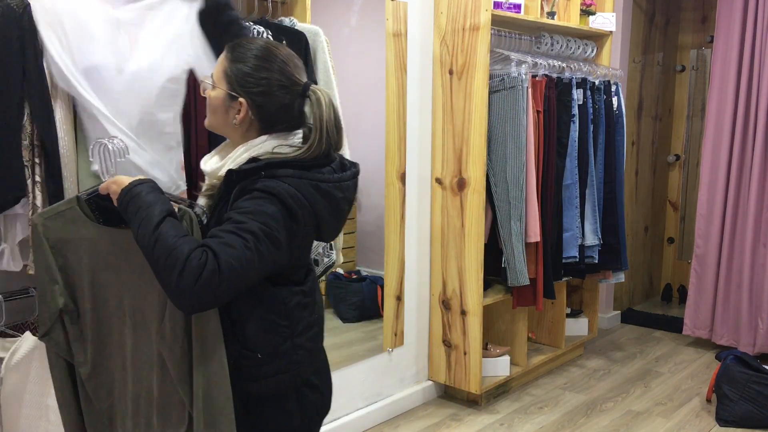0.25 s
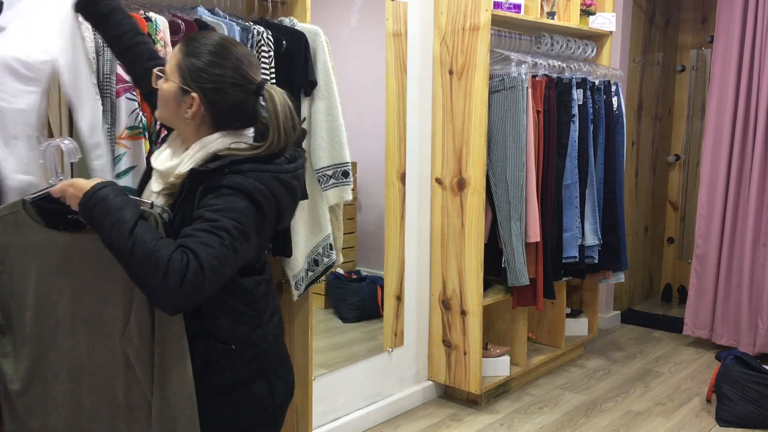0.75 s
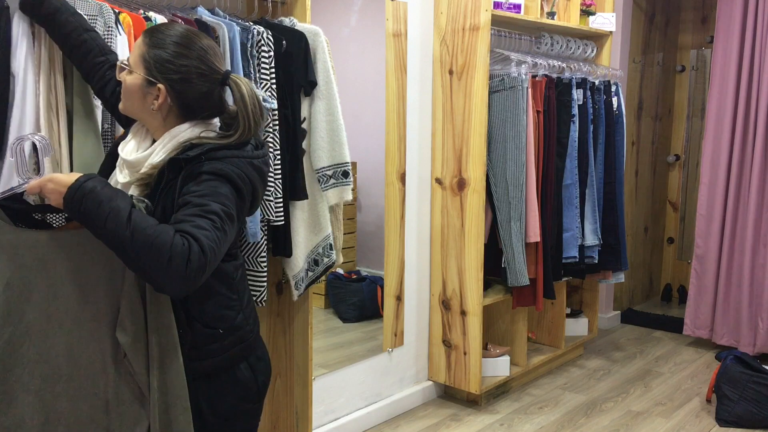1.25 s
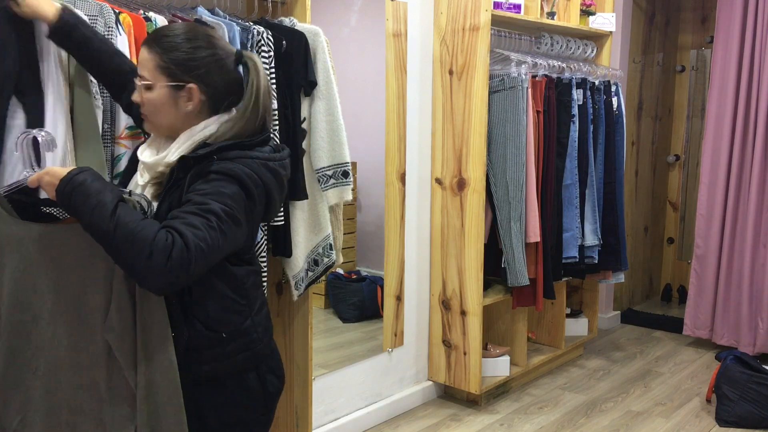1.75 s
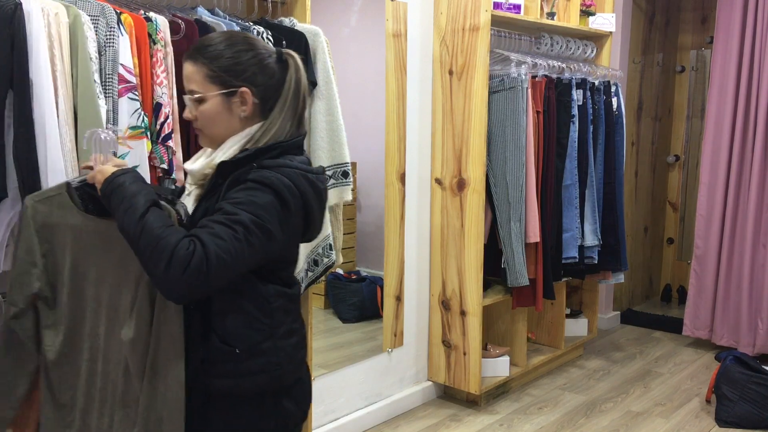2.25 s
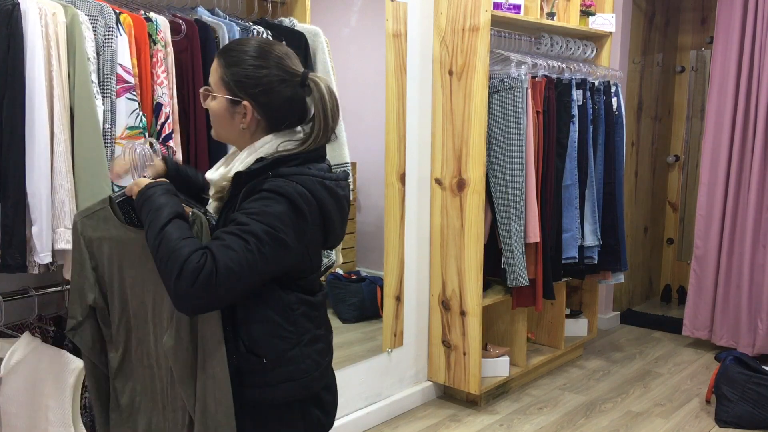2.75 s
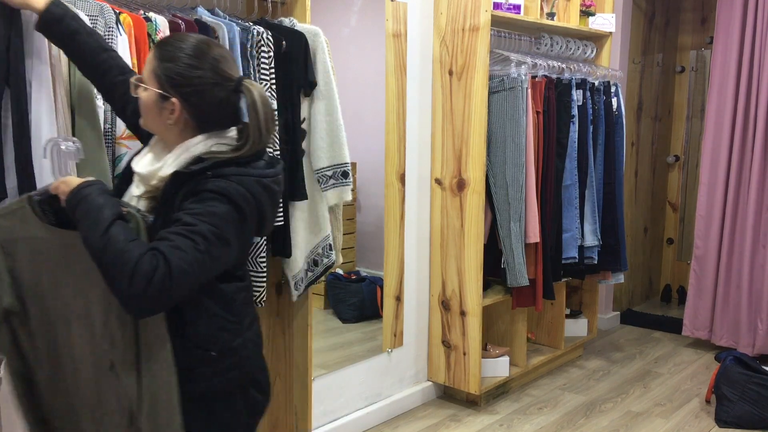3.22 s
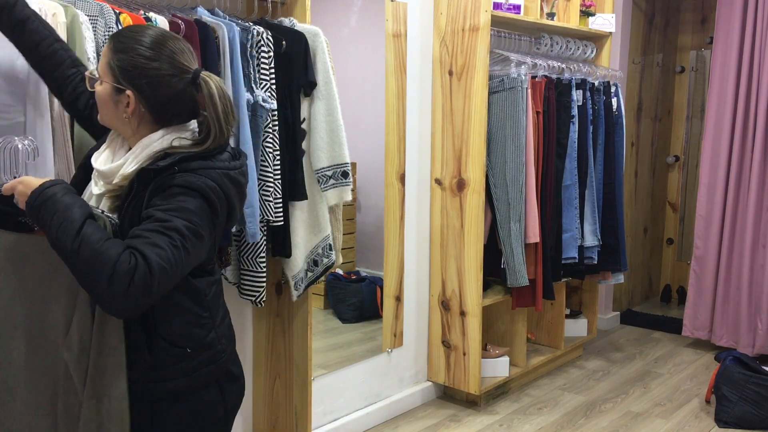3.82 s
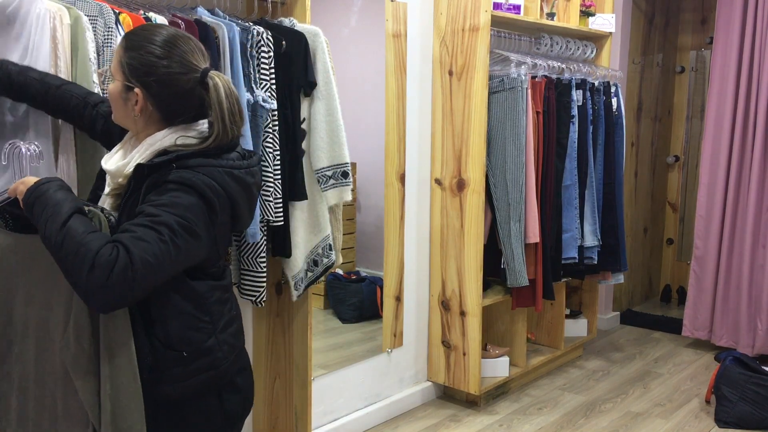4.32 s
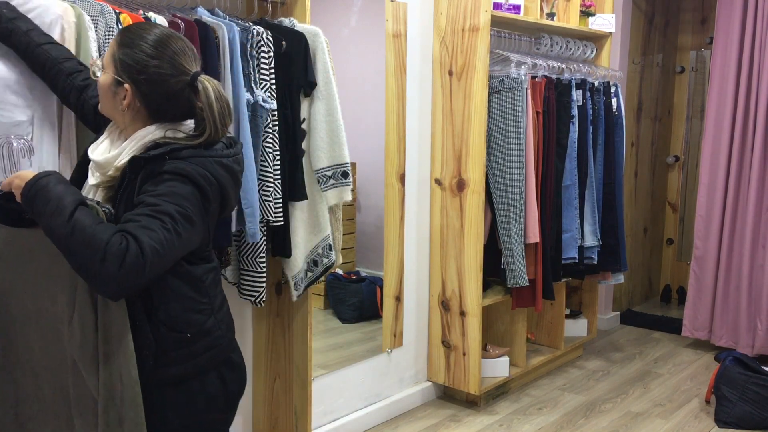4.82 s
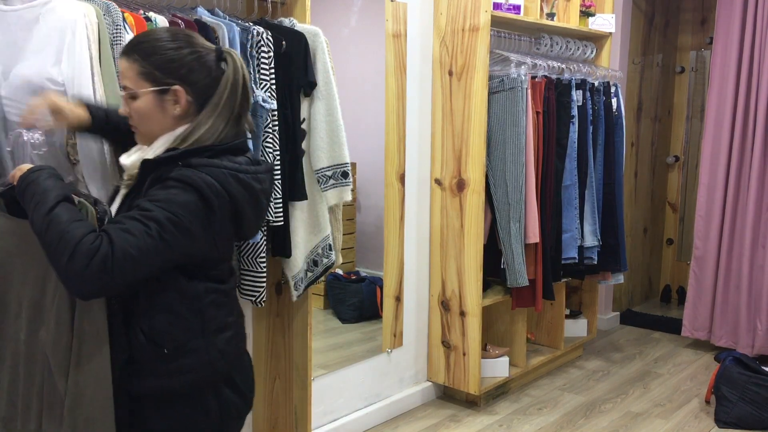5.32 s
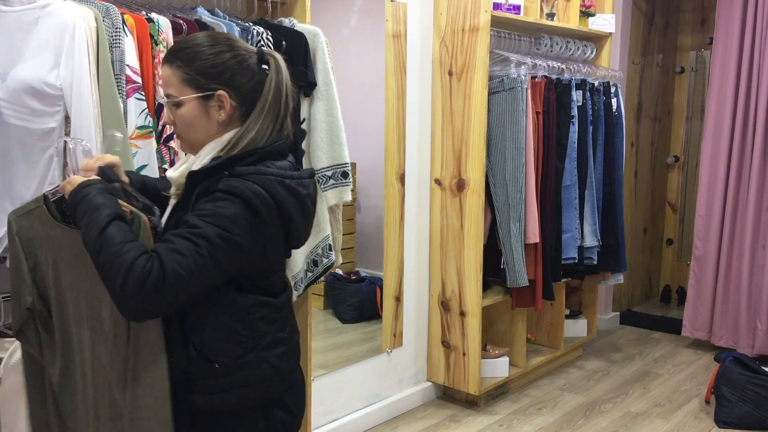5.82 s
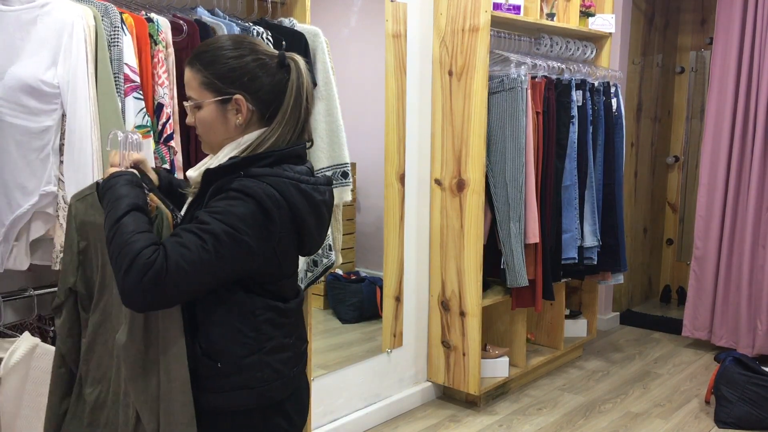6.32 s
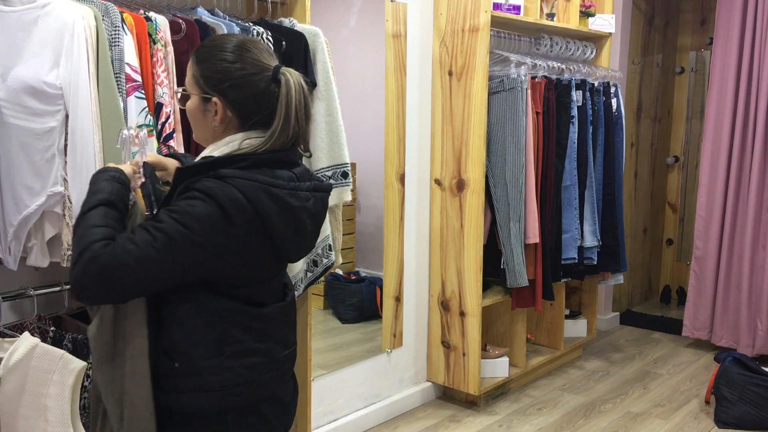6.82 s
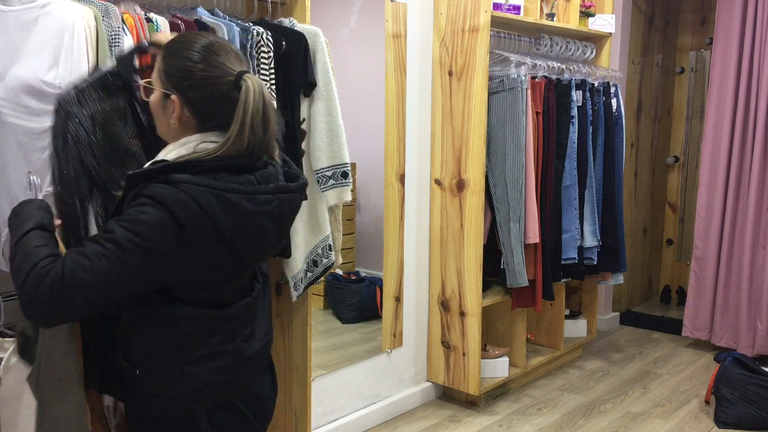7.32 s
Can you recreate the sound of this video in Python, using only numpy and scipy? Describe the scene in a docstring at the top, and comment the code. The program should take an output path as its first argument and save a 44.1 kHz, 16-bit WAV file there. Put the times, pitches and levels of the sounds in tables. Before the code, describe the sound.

In a small clothes shop, street traffic rumbles steadily through the walls. A plastic hanger clacks sharply against a steel rail and rings briefly. Later, wire hooks scrape and click in two quick clusters, with soft bumps of clothes and faint swishes of a nylon jacket sleeve. In the second half, an engine outside twice settles into a low drone. The hangers sound near, with a short room echo.

```python
"""Plastic hangers are handled at a steel rail in a small clothes shop. One clacks against the rail
and its whole frame rings, another rubs past its neighbour, and wire hooks click and scrape.
Clothes bump softly, and the nylon sleeve of a padded jacket swishes as an arm moves.
Street traffic booms through the walls, and twice an engine outside settles into a low drone."""
import sys
import numpy as np
from scipy import signal
from scipy.fft import rfft, irfft, next_fast_len
from scipy.io import wavfile

SR = 44100
rng = np.random.default_rng(int(sys.argv[2]) if len(sys.argv) > 2 else 0)


def master_out(mix):
    """Clip the mix to full scale and print it as 16-bit PCM to the path in sys.argv[1]."""
    frames = np.transpose(np.atleast_2d(mix))
    ceiling = np.clip(frames, -1, 1)
    pcm = np.round(ceiling * 32767).astype(np.int16)
    wavfile.write(sys.argv[1], SR, pcm)


N = 333396

# How long the shop echoes (a fade_s is the time to drop by 60 dB): freq_hz, fade_s
SHOP_ECHO = [(200, 0.68), (1400, 0.4), (4000, 0.26), (9500, 0.24), (15000, 0.15)]
# Dips where low sound waves cancel in the room: freq_hz, gain_db
ROOM_DIPS = [(82, 0.5), (90, -4.5), (98, 0.5), (210, 0), (218, -7), (226, -3.5), (240, 0)]
# The tone of the microphone: freq_hz, gain_db
MIC_TONE = [(20, 5), (32, 0.5), (4680, 0), (4960, -6), (5300, 0), (10000, -1), (10400, -5.5), (10900, 0.5)]

# Tyre noise growing as traffic comes closer: time_s, level_db
TYRE_LEVELS = [(0, -55.5), (.5, -58.5), (2.85, -58), (3.6, -54.5), (5.6, -50.5), (7.56, -50.5)]
# The tone of the tyres and of the street's rumble: freq_hz, gain_db
TYRE_TONE = [(200, -23), (400, -4), (700, -6), (1150, -4), (1550, -7.5), (1900, -12.5), (2500, -10.5),
             (4300, -17.5), (5900, -15.5), (7700, -20), (9400, -18), (11000, -21), (13500, -21),
             (15700, -24.5)]
RUMBLE_TONE = [(20, -52), (36, 0), (45, -7.5), (62, 6.5), (78, 0.5), (91, 1), (101, -3.5), (114, -8),
               (128, -5), (150, -10.5), (205, -16.5), (260, -15), (330, -18), (700, -55.5)]
# Low notes from far traffic: peak_s, pitch_hz, level_db, half_length_s
FAR_BOOMS = [(.09, 71.4, -36, 0.072), (2.386, 63.1, -32.5, 0.11), (2.755, 64, -33.5, 0.087),
             (3.364, 71.3, -33.5, 0.048), (3.667, 67.7, -30.5, 0.045), (4.348, 65.96, -38.5, 0.073),
             (6.19, 65.7, -43.5, 0.18)]
# A heavy vehicle pulling through its gears: peak_s, level_db, rise_s, fall_s
GEAR_PULLS = [(.98, -35.5, .25, 0.092), (2.15, -38.5, 0.28, 0.25)]
# An engine dropping from a rev to a drone: start_s, end_s, level_db
ENGINE_DRONES = [(4.83, 5.884, -30), (6.76, 7.558, -28)]
# The higher notes in its buzz: multiple_of_firing_rate, gain_db
ENGINE_OVERTONES = [(2, 2), (3, 1), (4, -10.5), (5, -13), (7, -15.5), (8, -15.5), (9, -21), (10, -18.5),
                    (12, -14.5), (13, -30), (14, -22), (15, -17.5), (22, -24)]

# Moves of the sleeve: peak_s, level_db, half_length_s
SLEEVE_STROKES = [(0.115, -60, 0.065), (3.386, -61, 0.09), (3.96, -80, .06), (4.128, -66, 0.045),
                  (4.7, -63, 0.068), (6.007, -57.5, 0.21), (6.616, -62, 0.047), (6.795, -60, 0.12)]
# Where the hiss of nylon is strongest: freq_hz, width_hz, gain_db
NYLON_PEAKS = [(900, 900, -4), (2700, 1600, 4.5), (5860, 450, 0), (9250, 350, 3.5), (12850, 260, 5.5),
               (13200, 240, -2)]
# Clothes bumping their neighbours: start_s, level_db, pitch_hz, rise_s
CLOTHES_BUMPS = [(1.074, -50, 790, .012), (1.103, -50.5, 775, 0.01), (2.984, -50.5, 534, 0.007),
                 (3.03, -55, 850, 0.0073), (3.427, -53, 950, 0.013), (3.493, -45, 308, 0.022),
                 (3.893, -52.5, 322, 0.014), (4.66, -52, 245, .06), (4.796, -48, 290, 0.032),
                 (4.815, -54, 950, .02), (4.968, -47, 255, 0.029)]
# Where a dragged hanger squeaks: freq_hz, width_hz, gain_db
SQUEAK_PEAKS = [(304, 50, 7), (940, 95, -1), (1250, 52, 3.5), (1540, 69, 0), (2600, 61.5, 1),
                (3040, 80, -6)]
# The tone of a hook scraping the rail: freq_hz, gain_db
SCRAPE_TONE = [(180, -23), (310, -4), (480, -8), (1200, -2), (2000, -7), (3300, 1), (5000, -0.5),
               (6500, -0.5), (9000, 2), (12500, -1), (15700, -3.5)]
# Hooks tapping the rail and each other: start_s, rail_db, hook_db, fade_s
HOOK_TAPS = [(.751, -54, -61, .045), (1.412, -41, -68, .011), (2.547, -37, -33.5, .068),
             (3.5357, -29.5, -34, .025), (3.588, -46, -29.5, .047), (3.6562, -17, -25, 0.058),
             (3.7404, -20, -22.5, .03), (3.9003, -49, -60, .016), (4.819, -26.5, -42, .038),
             (4.8283, -18, -28.5, 0.031), (4.8943, -19.5, -22, 0.031), (4.9453, -19, -30, 0.05),
             (4.9628, -9.5, -27, 0.036), (4.976, -26, -41, .039), (4.988, -25, -25.5, .036),
             (5.609, -51, -43, .03), (5.632, -38, -38, 0.04), (6.2591, -32, -29, .05),
             (6.51, -61, -48, .042), (6.626, -67, -46, .039), (6.828, -62, -44.5, 0.039)]
# Where the rail, the wire hook and the plastic under it ring: freq_hz, width_hz, gain_db
RAIL_PEAKS = [(6350, 160, -17), (6740, 310, -10.5), (7800, 350, -7.5), (8670, 320, -5.5), (9550, 210, -4.5),
              (10000, 300, -4), (10800, 220, -1.5), (12000, 200, 4), (11770, 220, 4), (13000, 320, 2),
              (13400, 400, 1), (14104, 200, -7), (14500, 390, 2), (14800, 430, 3), (15600, 250, -10)]
HOOK_PEAKS = [(6240, 220, -3), (6730, 150, -9.5), (7470, 230, -6), (8600, 130, -9), (9390, 200, 3),
              (10100, 120, -4), (10650, 160, -7), (11750, 130, 1), (12900, 200, -0.5), (13300, 260, -14),
              (14400, 130, -8), (14900, 130, -10), (15500, 200, -10)]
PLASTIC_PEAKS = [(286, 66, 6), (507, 53, -5), (884, 84, 0), (1270, 89, -0.5), (1575, 58, 1),
                 (1840, 56, -1.5), (2210, 200, -5.5), (2675, 120, -1.5), (3120, 300, -6), (3670, 290, -7),
                 (4070, 130, -2.5), (4550, 640, -6), (6040, 920, -4.5)]
# The tone of plastic striking the rail: freq_hz, gain_db
CRACK_TONE = [(120, -10), (270, 5.5), (480, -1), (620, 2), (1100, -11.5), (1600, 3), (2000, -7),
              (3200, -0.5), (3850, 2), (4650, 5.5), (5300, -4), (8700, 5.5), (11700, 4.5), (15500, 1)]
# The notes of a struck hanger frame: pitch_hz, gain_db, fade_s
FRAME_NOTES = [(238, -1, 0.52), (272, -2, 0.54), (338, -8.5, 0.29), (420, -14, 0.39), (480, -11, 0.63),
               (563, -5, 0.42), (623, -2, 0.29), (910, -2, 0.31), (1189, -6.5, 0.44), (1330, -8, 0.39),
               (1570, -1, 0.2), (1640, 0, 0.19), (2150, -5, 0.18), (2600, -9, .22), (3010, -8.5, 0.26),
               (3810, -1, 0.22), (4200, -17, 0.22), (4580, -9, 0.25), (6030, -22, 0.19), (6950, -13, 0.18),
               (7660, -11, 0.14), (8000, -8, 0.18), (8710, 1, 0.15), (9183, -7, .2), (9900, -14, 0.18),
               (11300, -6, 0.17), (11430, 4, 0.15), (12063, -9, .17), (13200, -9, .17), (14700, 3, 0.14)]


def amp(db):
    """Turn decibels into a number to multiply by."""
    return 10 ** (np.asarray(db) / 20)


def unit(x):
    """Scale a sound to an average (rms) strength of 1."""
    return x / np.sqrt(np.mean(x ** 2) + 1e-20)


def along(points, hz):
    """Read between the rows of a (freq_hz, value) table, on a log frequency scale."""
    freqs, values = np.transpose(points)
    return np.interp(np.log(hz + 1), np.log(freqs + 1), values)


def wobble(rate):
    """A smooth random curve through `rate` points a second."""
    count = int(N * rate / SR) + 4
    smooth = signal.resample(rng.standard_normal(count), count * 10)
    return np.interp(np.arange(N) * rate / SR, np.arange(len(smooth)) / 10, smooth)


def fade(t, fade_s):
    """Die away by 60 dB every fade_s seconds."""
    return np.exp(-np.log(1000) * t / fade_s)


def swell(t, rise_s, fall_s):
    """A bell-shaped rise and fall that peaks at t = 0."""
    return np.exp(-(t / np.where(t < 0, rise_s, fall_s)) ** 2 / 2)


def add(track, start_s, sound):
    """Mix a sound into the track at start_s."""
    part = track[max(round(start_s * SR), 0):][:len(sound)]
    part += sound[:len(part)]


def filtered(x, gain_at):
    """Multiply each frequency in a sound by gain_at(hz)."""
    size = next_fast_len(len(x) + 8192)
    return irfft(rfft(x, size) * gain_at(np.fft.rfftfreq(size, 1 / SR)), size)[:len(x)]


def shaped(x, tone):
    """Give a sound the tone of a (freq_hz, gain_db) table."""
    return filtered(x, lambda hz: amp(along(tone, hz)))


def noise(tone, size=N):
    """Noise of strength 1 with the given tone."""
    return unit(shaped(rng.standard_normal(size), tone))


def ringing_noise(peaks, size=N):
    """Noise of strength 1 gathered around (freq_hz, width_hz, gain_db) peaks."""
    centre, width, db = np.transpose(peaks)[:, :, None]

    def gain_at(hz):
        each_peak = amp(db) * hz * width / (centre ** 2 - hz ** 2 + 1j * hz * width)
        return np.linalg.norm(each_peak, axis=0)
    return unit(filtered(rng.standard_normal(size), gain_at))


def ringing_notes(notes, t, scatter_db):
    """Pure notes that fade together, each at a slightly random strength."""
    hz, db, fade_s = np.transpose(notes)[:, :, None]
    gain = amp(db + scatter_db * rng.standard_normal(db.shape))
    phase = 2 * np.pi * (hz * t + rng.random(hz.shape))
    return np.sum(gain * np.sin(phase) * fade(t, fade_s), axis=0) / np.linalg.norm(gain)


def in_shop(x, echo_db):
    """Add the small room's echo, in which low notes last longest."""
    hz, t, bands = signal.stft(rng.standard_normal(SR // 2), SR, nperseg=256)
    echo = signal.istft(bands * fade(t, along(SHOP_ECHO, hz)[:, None]), SR, nperseg=256)[1]
    echo *= 1 - np.exp(-(np.arange(len(echo)) / SR / 0.0088) ** 2)  # echoes take a moment to build
    echo *= amp(echo_db) / np.linalg.norm(echo)
    echo[0] += 1  # the direct sound
    return signal.fftconvolve(x, echo)[:len(x)]


def street():
    """Tyre noise gets brighter as it grows, over a rumble that gathers in the room's low notes."""
    times, levels = np.transpose(TYRE_LEVELS)
    tyre_db = np.interp(np.arange(N) / SR, times, levels)
    growth_db = tyre_db - tyre_db.mean()
    tyres = noise(TYRE_TONE)
    roar = filtered(tyres, lambda hz: 1 / (1 + (hz / 1600) ** 4))
    hiss = tyres - roar
    road = amp(growth_db) * hiss + amp(0.75 * growth_db) * roar  # the low roar grows more slowly
    rumble = amp(-40.5 + 0.33 * growth_db + 0.5 * wobble(5)) * noise(RUMBLE_TONE)
    return amp(tyre_db.mean() + 0.48 * wobble(9)) * road + rumble


def far_traffic():
    """Far traffic comes through only as single low notes that swell and fade."""
    out, t = np.zeros(N), np.arange(N) / SR
    for peak_s, hz, db, half_s in FAR_BOOMS:
        note = unit(np.sin(2 * np.pi * (hz * t + rng.random())))
        out += amp(db) * swell(t - peak_s, half_s, half_s) * note
    return out


def heavy_vehicle():
    """A heavy vehicle throbs, its pitch climbing as it pulls through each gear."""
    out, t = np.zeros(N), np.arange(N) / SR
    pitch_hz, climb_hz_per_s = 36.6, 4.5
    for peak_s, db, rise_s, fall_s in GEAR_PULLS:
        hz = pitch_hz + climb_hz_per_s * (t - peak_s)
        note = unit(np.sin(2 * np.pi * np.cumsum(hz) / SR))
        out += amp(db) * swell(t - peak_s, rise_s, fall_s) * note
    return out


def engine():
    """An engine slows from a rev to a steady firing rate, where the room booms and buzzes with it."""
    out, t = np.zeros(N), np.arange(N) / SR
    steady_hz, rev_extra_hz, settle_s = 69.1, 6, 0.13
    sag_hz_per_s, build_db_per_s, boom_width_hz = 12.3, 2.5, 5.5
    for start_s, end_s, db in ENGINE_DRONES:
        early, late = np.minimum(t - start_s, 0), np.maximum(t - end_s, 0)
        rev_hz = rev_extra_hz * np.exp(-np.maximum(t - start_s, -settle_s) / settle_s)
        hz = steady_hz + rev_hz - sag_hz_per_s * late
        phase = 2 * np.pi * np.cumsum(hz * (1 + 0.0012 * wobble(8))) / SR
        settled = 1 / (1 + ((hz - steady_hz) / boom_width_hz) ** 2)  # 1 at the steady rate
        hum_db = db + build_db_per_s * np.minimum(t - end_s, 0) + 0.95 * wobble(11)
        hum = amp(hum_db) * unit(np.sin(phase))
        buzz = unit(sum(
            amp(gain_db + 1.3 * wobble(5.5)) * np.sin(multiple * phase + 2 * np.pi * rng.random())
            for multiple, gain_db in ENGINE_OVERTONES))
        octave = unit(np.sin(2 * phase))  # takes over while the engine revs
        overtones = amp(-44) * settled ** 2 * buzz + amp(-40.3) * np.sqrt(1 - settled) * octave
        out += swell(early + late, rise_s=0.09, fall_s=0.089) * settled * hum
        out += swell(early + late, rise_s=0.055, fall_s=0.049) * overtones
    return out


def sleeve():
    """The nylon weave of a padded jacket swishes faintly at each move of the arm."""
    t = np.arange(N) / SR
    strokes = sum(amp(db) * swell(t - peak_s, half_s, half_s) for peak_s, db, half_s in SLEEVE_STROKES)
    return strokes * amp(0.64 * wobble(30)) * ringing_noise(NYLON_PEAKS)


def clothes_bumps():
    """Hangers padded by their clothes meet with dull, hollow bumps."""
    out, t = np.zeros(N), np.arange(SR // 3) / SR
    for start_s, db, hz, rise_s in CLOTHES_BUMPS:
        peaks = [(hz, hz / 9, 0), (hz * 1.45, hz / 6, -3), (hz * 2.08, hz / 4, -9)]
        soft_push = t / rise_s * np.exp(1 - t / rise_s)
        add(out, start_s, amp(db) * ringing_noise(peaks, len(t)) * soft_push)
    return in_shop(out, echo_db=-9.5)


def hanger_rub():
    """A hanger rubs past its neighbour, its pitch rising as the touching point slides."""
    start_s, end_s, start_hz, end_hz = 4.835, 4.995, 1000, 2850
    t = np.arange(N) / SR
    held_t = np.clip(t, start_s, end_s)
    progress = (held_t - start_s) / (end_s - start_s)
    hz = start_hz * (end_hz / start_hz) ** (progress ** 1.3)  # the slide speeds up
    phase = 2 * np.pi * np.cumsum(hz) / SR
    friction = unit(wobble(520) * np.sin(phase) + wobble(520) * np.cos(phase))  # a narrow band of noise
    stroke = swell(t - held_t, rise_s=0.016, fall_s=0.016)
    return in_shop(amp(-53.5) * stroke * friction, echo_db=-3)


def hook_scrape():
    """A dragged hook first squeaks through its hanger, then catches on the rail in many tiny slips."""
    t = np.arange(N) / SR
    squeak_s, rasp_s = 3.462, 3.485
    slips = rng.standard_normal(N) * amp(2.5 * wobble(1100))
    squeak = amp(-47.5) * swell(t - squeak_s, rise_s=0.016, fall_s=0.034) * ringing_noise(SQUEAK_PEAKS)
    rasp = amp(-39.5) * swell(t - rasp_s, rise_s=0.01, fall_s=0.04) * unit(shaped(slips, SCRAPE_TONE))
    return in_shop(squeak + rasp, echo_db=-5)


def hook_clicks():
    """Each hook chatters briefly on the rail, rings on, and shakes the plastic under it."""
    out, t = np.zeros(N), np.arange(SR // 3) / SR
    for start_s, rail_db, hook_db, fade_s in HOOK_TAPS:
        chatter = fade(t, fade_s)
        rail = amp(rail_db) * ringing_noise(RAIL_PEAKS, len(t)) * chatter
        hook = amp(hook_db) * ringing_noise(HOOK_PEAKS, len(t)) * (chatter + amp(-17) * fade(t, 0.23))
        tap_db = (rail_db + hook_db) / 2
        plastic = amp(-28.7 + 0.5 * tap_db) * ringing_noise(PLASTIC_PEAKS, len(t)) * fade(t, 0.09)
        add(out, start_s, in_shop(rail + hook, echo_db=-4.5) + in_shop(plastic, echo_db=-0.5))
    return out


def hanger_clack():
    """A plastic shoulder touches the rail, strikes it hard, rings, and knocks the next hanger."""
    out, t = np.zeros(N), np.arange(SR // 2) / SR
    strike_s = 1.2275
    touch = amp(-47) * noise(CRACK_TONE, len(t)) * fade(t, 0.06)
    add(out, strike_s - 0.0047, touch)
    contact = fade(t, 0.052) * (1 - 0.7 * fade(t, 0.012))
    crack = amp(-17.8) * noise(CRACK_TONE, len(t)) * contact
    frame = amp(-28) * ringing_notes(FRAME_NOTES, t, scatter_db=1) * (1 - fade(t, 0.012))
    add(out, strike_s, in_shop(crack, echo_db=-4.5) + frame)
    knock = ringing_noise([(900, 70, -2), (1240, 90, -4), (1600, 140, -2)], len(t)) * fade(t, 0.069)
    add(out, strike_s + 0.0081, in_shop(amp(-36.5) * knock, echo_db=-4))
    return out


def scene():
    """Hangers and cloth over the traffic, in one channel."""
    traffic = shaped(engine() + far_traffic() + heavy_vehicle() + street(), ROOM_DIPS)
    hangers = hook_clicks() + hanger_clack() + hook_scrape() + hanger_rub()
    cloth = clothes_bumps() + sleeve()
    return (traffic + cloth + hangers)[None]


def record(dry):
    """The microphone lifts the deepest bass, has two narrow dips and loses the highest treble."""
    top_hz = 15750
    coloured = shaped(dry[0], MIC_TONE)
    return filtered(coloured, lambda hz: 1 / np.sqrt(1 + (hz / top_hz) ** 400))[None]


dry = scene()
out = record(dry)
master_out(out)
```